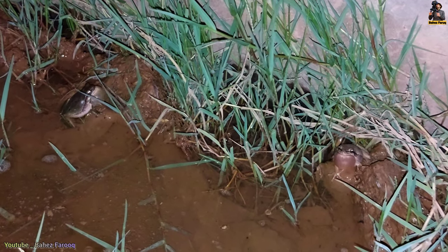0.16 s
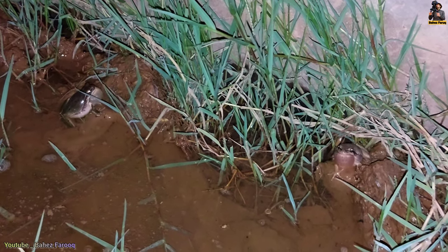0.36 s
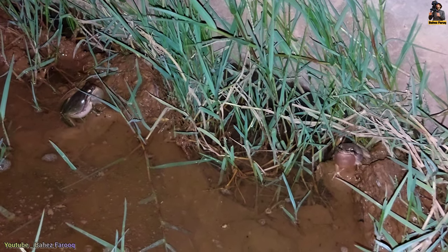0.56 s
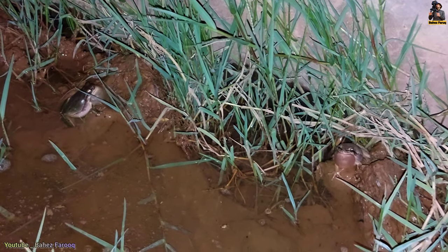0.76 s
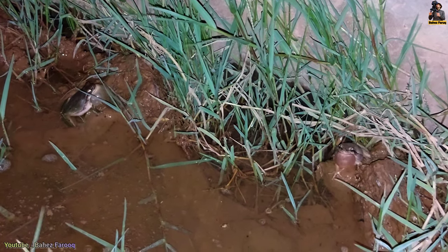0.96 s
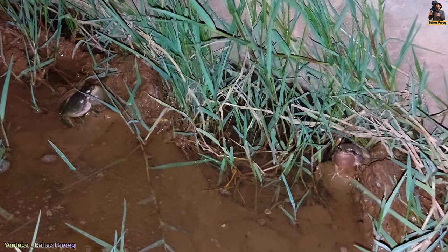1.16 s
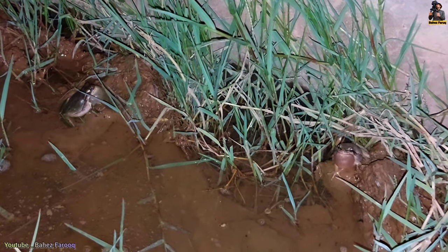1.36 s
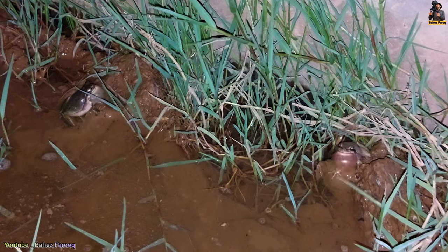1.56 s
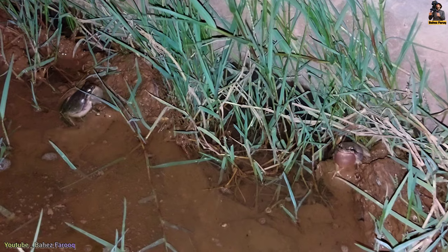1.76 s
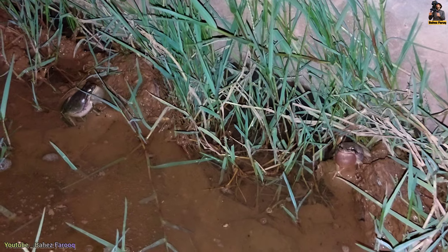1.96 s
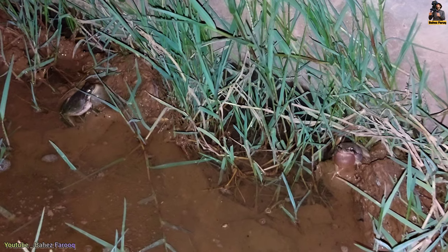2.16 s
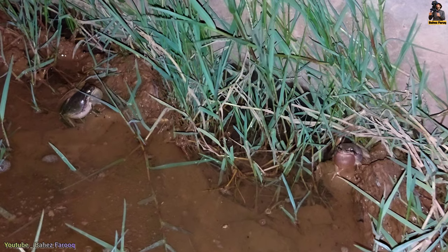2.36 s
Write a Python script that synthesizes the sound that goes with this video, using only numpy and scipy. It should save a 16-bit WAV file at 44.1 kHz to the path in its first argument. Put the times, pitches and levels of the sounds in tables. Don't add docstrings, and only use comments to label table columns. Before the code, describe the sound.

A small frog close on the right beeps fast shrill pulse trains over a night puddle's rumbling wind

```python
import sys
import numpy as np
from scipy import signal
from scipy.fft import rfft, irfft
from scipy.io import wavfile
from scipy.ndimage import uniform_filter1d, minimum_filter1d

SR = 44100
rng = np.random.default_rng(int(sys.argv[2]) if len(sys.argv) > 2 else 0)


def to_wav(sig):
    pcm = np.clip(np.atleast_2d(sig), -1, 1) * 32767
    pcm = np.round(pcm).astype(np.int16)
    wavfile.write(sys.argv[1], SR, pcm.T)


def magnitude_from_level(level_db):
    exponent = np.asarray(level_db, float) / 20
    return 10 ** exponent


N = 108045

# frequency in Hz, density in dB per Hz.
AIR_SPECTRUM = [(300, -20), (600, -44), (850, -26), (1200, -4), (1800, -7), (2300, -18), (2900, -2),
                (3600, -26), (7000, -50)]
# left, right in dB.
AIR_LEVEL_DB = [-61, -59]
# time in seconds, level in dB.
GUSTS = [(0.0, -32.5), (0.29, -40.5), (0.31, -27), (0.5, -49.5), (0.76, -43.5), (0.79, -53.5), (0.97, -54),
         (0.99, -48.5), (1.36, -43), (1.38, -34.5), (1.45, -46), (1.55, -33), (1.58, -42.5), (1.74, -41),
         (2.01, -50.5), (2.05, -36), (2.11, -45.5), (2.45, -33.5)]
# first pulse in seconds, last pulse in seconds, pulse period in ms,
# level in dB, swelling already done in seconds.
FAR_TRAINS = [
    (.0, .03, 4, -40, 0.013),
    (.06, .135, 4.1, -37.5, 0),
    (.245, .3, 5.7, -56, 0),
    (.59, .66, 5.7, -29.5, 0),
    (.795, .815, 2.4, -30, 0.015),
    (.862, .885, 4.2, -36.5, 0.031),
    (1.055, 1.14, 6.3, -29, 0),
    (1.27, 1.35, 7, -41, 0),
    (1.49, 1.56, 6.7, -37, 0),
    (1.772, 1.845, 6.5, -31, 0),
]
# start in seconds, length in seconds, level in dB, throat in Hz, pulse period in ms.
CROAK_BURSTS = [(0.62, 0.061, -25, 2410, 6), (0.741, 0.0057, -24, 2350, 4.3),
                (0.767, 0.021, -27.5, 2410, 2.6), (0.827, 0.034, -23, 2410, 5.9),
                (0.883, 0.027, -28.5, 2180, 4.1), (0.934, 0.0084, -27.5, 2010, 6),
                (0.973, 0.047, -33.5, 1945, 6.1), (1.003, 0.049, -50.5, 1800, 8.1),
                (1.962, 0.064, -27.5, 2286, 6), (2.025, 0.04, -27.5, 2195, 6.1),
                (2.087, 0.028, -24.5, 2340, 5.6), (2.148, 0.015, -18, 2400, 7.2),
                (2.208, 0.018, -24, 2360, 5), (2.254, 0.034, -22.5, 2260, 9.1),
                (2.301, 0.037, -27.5, 2050, 6.9), (2.345, 0.038, -32, 1780, 9.5),
                (2.381, 0.033, -33, 1872, 5.1)]
# centre in Hz, width in Hz, right level in dB, left level in dB.
THROAT_MODES = [(465, 90, -17, -16), (900, 350, -20, -19), (1500, 400, -20, -23), (2900, 450, -8, -17),
                (3700, 300, -13, -25), (4850, 180, -15, -30)]
RIVAL_TRAINS = [
    (1.5668, 1.616, 5.3, 0.0079, 0.023),
]
# final pitch in Hz, starts lower by Hz, right level in dB, left level in dB,
# scatter as a share of pitch.
RIVAL_PARTIALS = [(2962, 920, -1.5, -21.5, 0.0021), (1184, 68, -32, -30.5, 0.0036),
                  (3600, 390, -22.5, -40.5, 0.088), (5600, 830, -32, -49, .012),
                  (6750, 780, -39.5, -84, 0.0234), (8550, 240, -34, -55.5, 0.023)]
NEAR_TRAINS = [
    (.1488, 0.2274, 5.78, 2, 0.0099),
    (0.3989, 0.4901, 5.55, 1.5, 0.017),
    (.6584, .7451, 5.6, 1.5, 0.014),
    (.9011, .9871, 5.62, 1.5, 0.016),
    (1.1537, 1.2352, 5.63, 3.5, 0.013),
    (1.3753, 1.461, 5.7, 2, 0.014),
    (1.6170, 1.6734, 5.6, 0.5, 0.034),
    (1.8622, 1.9399, 5.93, 1.5, 0.013),
    (2.1086, 2.1879, 5.6, 2.5, 0.013),
]
FROG_PARTIALS = [(2954, 462, -1.5, -18, 0.0011), (3610, 150, -23.5, -45, 0.012),
                 (4188, 300, -28.5, -51.5, 0.0032), (6000, 840, -40.5, -60.5, 0.008),
                 (7120, 2000, -29.5, -69.5, 0.0051), (4780, 150, -46, -53.5, 0.0087),
                 (2050, 420, -58, -43, 0.15), (1298, 250, -41, -38.5, 0.0089), (1744, 67, -35, -44.5, 0.01)]
HIGH_PARTIALS = [(11900, 800, -64, -85, .006), (11000, -4200, -52, -80, .012),
                 (12700, -4200, -54, -82, .015)]
# frequency in Hz, right level in dB, left level in dB, t60 in seconds.
BODY_MODES = [(1275, -20, -31, 0.074), (1545, -20, -28.5, 0.08), (1837, -21.5, -43.5, 0.09),
              (1469, -16, -26.5, 0.012), (1017, -43, -37.5, 0.037)]
# left, right in dB.
TAIL_LEVEL_DB = [-24, -13]
# left, right in dB.
EARLY_LEVEL_DB = [-31, -21]

WIND_HZ, WIND_TOP_HZ, WIND_EDGE_HZ, WIND_LEFT_DB, GUST_DB = 47.3, 139.2, 480, -12, -0.5
FAR_LEFT_DB, FAR_WET_DB = -15.5, 13
THROAT_WIDTH_HZ, THROAT_LEFT_DB, BOOM_DB_PER_KHZ, RASP = 330, -10.5, 29.5, .7
CROAK_TOP_HZ, CROAK_SPRAY_DB, CROAK_FOLD_DB, CROAK_WET_DB, CROAK_T60_S = 5000, -31.5, -40, 1, .2
RISE_MS, FALL_MS, PULSE_TAIL_MS, PULSE_TAIL_DB, PHASE_RAD = 2.65, .88, 2, -22, .2
FIRST_DB, SECOND_DB, LAST_DB, SCATTER_DB = -12, -3, -7, .6
EDGE_GAP_MS, HURRY_MS, JITTER_MS = .8, .81, .1
SWELL_S, FOLD_S, CHIRP_HZ, GROW_DB, RIVAL_STRETCH = .026, .09, 50, -4.5, 1.45
LEFT_TILT_DB, LEFT_LAG_S = 8.5, .00003
SING_HZ, SING_DB, FOLD_WET_DB = 1108.5, -35, 6.5
THUMP_DB, SPRAY_DB, TICK_DB, TICK_LEAD_MS = -42, -48, -25, 11
TAIL_T60_S, EARLY_T60_S, TAIL_TOP_HZ = 0.19, .035, 4500
LIMIT, TOP_HZ, LEFT_TOP_HZ, HISS_DB = .99, 7750, 3500, -84


def noise(*shape):
    return rng.standard_normal(shape)


def column(left, right):
    return np.array([[left], [right]])


def ring(x, hz, width_hz):
    return signal.lfilter(*signal.iirpeak(hz, hz / width_hz, fs=SR), x)


def lowpass(x, hz, order=8):
    return signal.sosfilt(signal.cheby1(order, .5, hz, fs=SR, output="sos"), x)


def walk(rate_hz):
    size = int(SR / rate_hz)
    wander = uniform_filter1d(uniform_filter1d(noise(N), size), size)
    return wander / wander.std()


def tail(x, t60_s):
    t = np.arange(SR // 2) / SR
    echo = noise(2, len(t)) * np.exp(-np.log(1000) * t / t60_s)
    echo /= np.sqrt((echo ** 2).sum(axis=1, keepdims=True))
    return signal.fftconvolve(np.atleast_2d(x), echo, axes=1)[:, :N]


def air():
    hz = np.fft.rfftfreq(N, 1 / SR) + 1
    knot_hz, knot_db = np.array(AIR_SPECTRUM).T
    curve_db = np.interp(np.log(hz), np.log(knot_hz), knot_db, left=-60, right=-70)
    hiss = irfft(rfft(noise(2, N)) * magnitude_from_level(curve_db), N)
    return hiss / hiss.std() * magnitude_from_level(np.array(AIR_LEVEL_DB)[:, None] + 2 * walk(2.8))


def wind():
    knot_s, knot_db = np.array(GUSTS).T
    band = signal.butter(2, [WIND_HZ, WIND_TOP_HZ], "band", fs=SR, output="sos")
    rumble = lowpass(signal.sosfilt(band, noise(2, N)), WIND_EDGE_HZ, order=2)
    rumble = rumble * magnitude_from_level(GUST_DB * np.array([walk(6.3), walk(39)]))
    gust_db = np.interp(np.arange(N) / SR, knot_s, knot_db)
    return rumble / rumble.std() * magnitude_from_level(gust_db + column(WIND_LEFT_DB + 3, 4))


def far_frogs():
    far = lowpass(beeper(FAR_TRAINS, FROG_PARTIALS)[0][1], TAIL_TOP_HZ, order=2)
    return (far + magnitude_from_level(FAR_WET_DB) * tail(far, 0.67)) * magnitude_from_level(column(FAR_LEFT_DB, -3))


def croak_drive(length_s, period_ms, t):
    luck, clicks = noise(20, 2), np.zeros(len(t))
    at_s = np.cumsum(period_ms / 1e3 * (1 + .15 * luck[:, 0])) - period_ms / 2e3
    clicks[(np.clip(at_s, 0, .13) * SR).astype(int)] = magnitude_from_level(1.2 * luck[:, 1])
    gate = signal.lfilter([1], [1, -np.exp(-1 / (0.005 * SR))], clicks)
    swell = np.clip(np.sin(np.pi * np.minimum(t / length_s, 1)), 0, 1) ** 0.36
    return (12 * clicks + RASP * 3 * gate * noise(len(t))) * swell


def croaker():
    out, spray = np.zeros((2, N + SR)), np.zeros(N + SR)
    t = np.arange(6000) / SR
    for start_s, length_s, db, throat_hz, period_ms in CROAK_BURSTS:
        drive = croak_drive(length_s, period_ms, t)
        voice = 4 * ring(ring(drive, throat_hz, THROAT_WIDTH_HZ), throat_hz, 310)
        voice = voice * magnitude_from_level(column(THROAT_LEFT_DB, 0))
        boom_db = BOOM_DB_PER_KHZ * (2300 - throat_hz) / 1000
        for hz, width_hz, right_db, left_db in THROAT_MODES:
            mode_db = column(left_db, right_db) + boom_db * (hz < 2000)
            voice = voice + ring(ring(drive, hz, width_hz), hz, 2 * width_hz) * 3 * magnitude_from_level(mode_db)
        i = int(start_s * SR)
        out[:, i:i + len(t)] += magnitude_from_level(db) * voice
        spray[i:i + len(t)] += magnitude_from_level(db) * drive
    out, spray = out[:, :N], spray[:N]
    out = lowpass(out, CROAK_TOP_HZ, order=5)
    out = out + magnitude_from_level(CROAK_SPRAY_DB) * ring(spray, 4300, 2600) * column(.3, 1)
    images = sum(ring(ring(spray, hz, 900), hz, 1500) for hz in (11800, 15000))
    images = images * magnitude_from_level(CROAK_FOLD_DB) * column(.1, 1)
    highpass = signal.butter(4, 1300, "high", fs=SR, output="sos")
    out = out + magnitude_from_level(CROAK_WET_DB) * tail(signal.sosfilt(highpass, out), CROAK_T60_S)
    return out, images + tail(images, EARLY_T60_S)


def pulse_shape(t, stretch):
    after_ms = np.maximum(t * 1e3 - RISE_MS, 0) / stretch
    decay = np.exp(-after_ms / FALL_MS) + magnitude_from_level(PULSE_TAIL_DB) * np.exp(-after_ms / PULSE_TAIL_MS)
    shape = np.minimum(t * 1e3 / RISE_MS, 1) ** 1.1 * decay
    shape = uniform_filter1d(uniform_filter1d(shape, size=30), size=30)
    shape = shape * np.sin(np.pi / 2 * np.minimum(t / .0011, 1)) ** 2
    return shape / shape.max()


def pulse_times(first_s, last_s, period_ms, luck):
    inner_ms = (last_s - first_s) * 1e3 - 2 * EDGE_GAP_MS
    count = max(int(round(inner_ms / period_ms)), 2)
    k = np.arange(count + 1)
    bow_ms = HURRY_MS * np.sin(np.pi * k / count)
    at_s = first_s + (EDGE_GAP_MS + k * inner_ms / count + bow_ms + JITTER_MS * luck[:count + 1]) / 1e3
    at_s[0], at_s[-1] = first_s, last_s
    return at_s


def beeper(trains, partials, swell_s=SWELL_S, stretch=1, folded=False):
    out, env = np.zeros((2, N + SR)), np.zeros(N + SR)
    t = np.arange(600) / SR
    final_hz, lower_hz, right_db, left_db, scatter = np.array(partials).T[:, :, None]
    shape, n = pulse_shape(t, stretch), len(partials)
    loose_rad = np.where(np.arange(n) == 0, PHASE_RAD, 3 * PHASE_RAD)[:, None]
    chirp = 1 - CHIRP_HZ / 3000 * (t - RISE_MS / 500) * 200
    for first_s, last_s, period_ms, db, done_s in trains:
        luck = noise(40, 2 + 2 * n)
        at_s = pulse_times(first_s, last_s, period_ms, luck[:, 0])
        pulse_db = db + SCATTER_DB * luck[:len(at_s), 1]
        pulse_db[[0, 1, -1]] += [FIRST_DB, SECOND_DB, LAST_DB]
        for s, d, u in zip(at_s, pulse_db, luck):
            slack = np.exp(-(s - first_s + done_s) / swell_s)
            if folded:
                d = d - 30 * np.where(lower_hz < 0, slack, 1 - slack) + 15
            else:
                d = d + GROW_DB * slack * (final_hz > 5000)
            hz = final_hz - lower_hz * slack ** np.where(final_hz > 5000, 1.5, 1)
            hz = np.minimum(hz * (1 + scatter * u[2:2 + n, None]), SR / 2.5)
            phase = 2 * np.pi * hz * t * chirp + loose_rad * u[2 + n:, None]
            left = (magnitude_from_level(d + left_db) * np.sin(phase - 2 * np.pi * hz * LEFT_LAG_S)).sum(axis=0)
            right = (magnitude_from_level(d + right_db) * np.sin(phase)).sum(axis=0)
            i = max(int((s - RISE_MS / 1e3) * SR), 0)
            out[0, i:i + len(t)] += magnitude_from_level(LEFT_TILT_DB * slack ** 1.6) * shape * left
            out[1, i:i + len(t)] += shape * right
            env[i:i + len(t)] += magnitude_from_level(np.max(d)) * shape
    return out[:, :N], env[:N]


def rival_sac(env):
    hum = np.sin(2 * np.pi * SING_HZ * np.arange(N) / SR + 1.5 * walk(40))
    return magnitude_from_level(SING_DB) * 10 * uniform_filter1d(env, size=240) * hum * column(-.6, 1)


def body(env, trains):
    rasp, out, t = env * noise(N), np.zeros((2, N)), np.arange(300) / SR
    for hz, right_db, left_db, t60_s in BODY_MODES:
        width_hz = np.log(1000) / np.pi / t60_s
        mode = ring(ring(rasp, hz, width_hz), hz, 810) * np.sqrt(SR / width_hz) / 8
        out = out + mode * magnitude_from_level(column(left_db, right_db)) * column(-1, 1)
    out[1] += magnitude_from_level(THUMP_DB) * 10 * ring(env, 380, 250)
    spray = uniform_filter1d(env, size=150) * noise(N)
    out += magnitude_from_level(SPRAY_DB) * ring(ring(spray, 6100, 2800), 5200, 4200) * 10 * column(.12, 1)
    for first_s, *_ in trains:
        i = int((first_s - TICK_LEAD_MS / 1e3) * SR)
        tick = lowpass(ring(noise(len(t)), 2700, 1400), TAIL_TOP_HZ, order=6)
        out[:, i:i + len(t)] += magnitude_from_level(TICK_DB) * np.hanning(len(t)) * tick * column(.3, 1)
    return out


def scene():
    croak, images = croaker()
    rival, rival_env = beeper(RIVAL_TRAINS, RIVAL_PARTIALS, stretch=RIVAL_STRETCH)
    frog, frog_env = beeper(NEAR_TRAINS, FROG_PARTIALS)
    close_trains = NEAR_TRAINS + RIVAL_TRAINS
    near = frog + rival + body(frog_env + rival_env, close_trains) + rival_sac(rival_env)
    folded = beeper(close_trains, HIGH_PARTIALS, FOLD_S, 0.75, True)[0]
    folded = images + magnitude_from_level(-5) * folded + magnitude_from_level(FOLD_WET_DB - 10.5) * tail(folded, EARLY_T60_S)
    wet = magnitude_from_level(np.array(TAIL_LEVEL_DB))[:, None] * tail(lowpass(near[1], TAIL_TOP_HZ, order=2), TAIL_T60_S)
    wet = wet + magnitude_from_level(np.array(EARLY_LEVEL_DB))[:, None] * tail(near[1], EARLY_T60_S)
    wet = wet + far_frogs() + air()
    wet[0] = lowpass(wet[0], LEFT_TOP_HZ, order=2)
    hiss = magnitude_from_level(HISS_DB) * noise(2, N) * column(.3, 1)
    return lowpass(near + wet + croak + wind(), TOP_HZ) + folded + hiss


def roll_off(x):
    return signal.sosfilt(signal.butter(12, 15790, fs=SR, output="sos"), x)


def record(dry):
    gain = np.minimum(1, LIMIT / (np.abs(dry) + 1e-9))
    gain = minimum_filter1d(gain, size=160)
    gain = uniform_filter1d(uniform_filter1d(gain, size=60), size=60)
    return roll_off(dry * gain)


dry = scene()
out = record(dry)
to_wav(out)
```